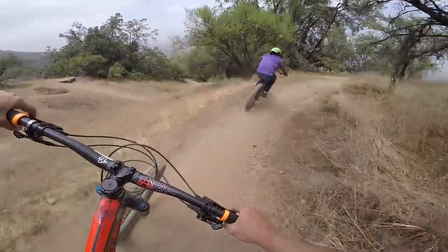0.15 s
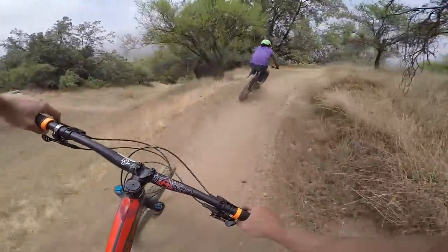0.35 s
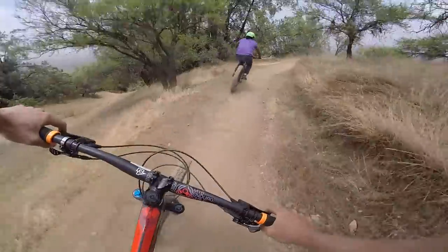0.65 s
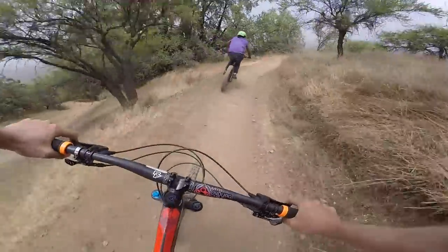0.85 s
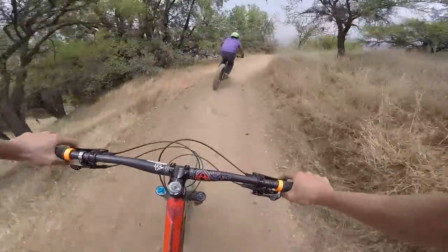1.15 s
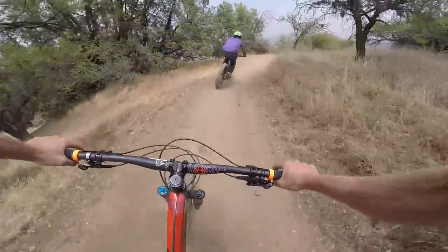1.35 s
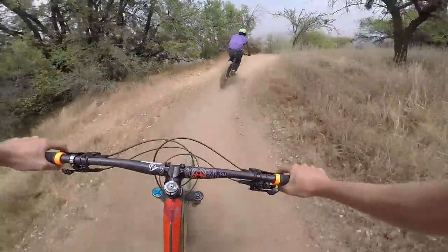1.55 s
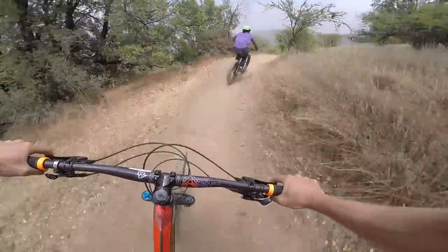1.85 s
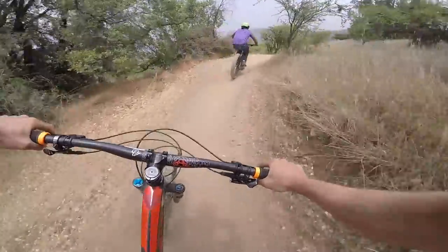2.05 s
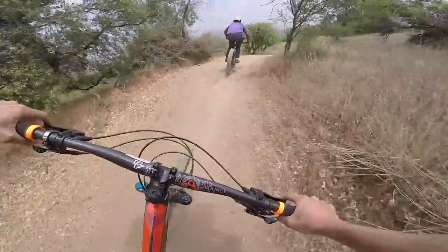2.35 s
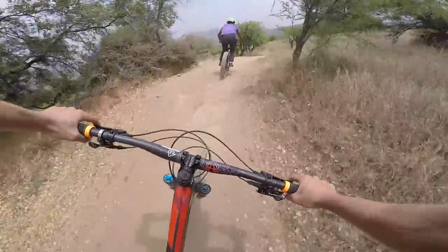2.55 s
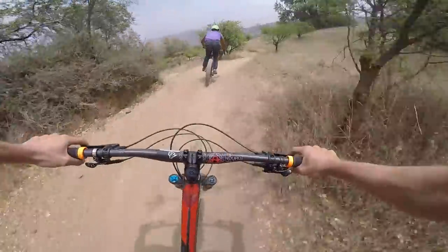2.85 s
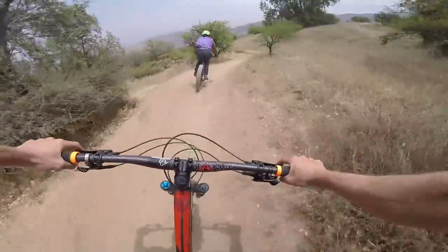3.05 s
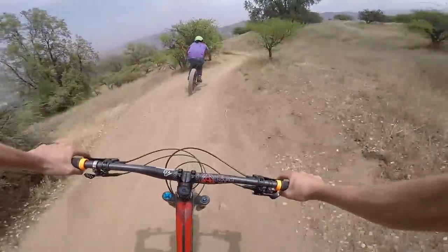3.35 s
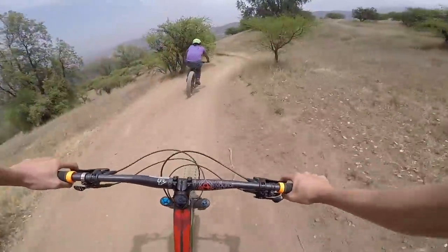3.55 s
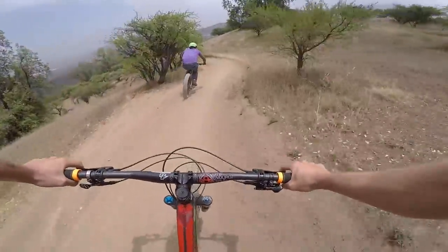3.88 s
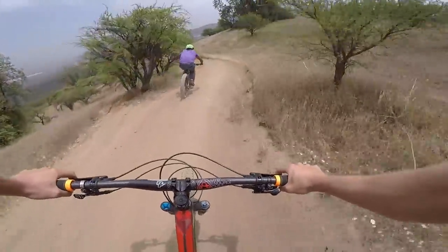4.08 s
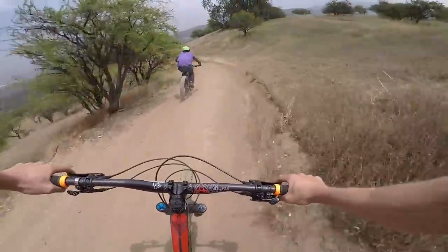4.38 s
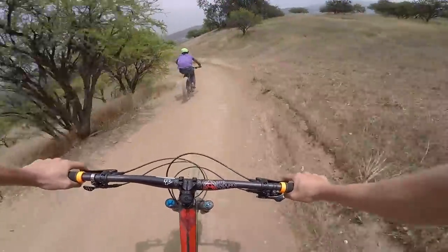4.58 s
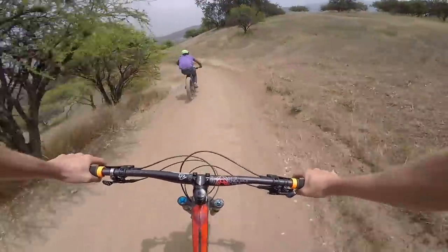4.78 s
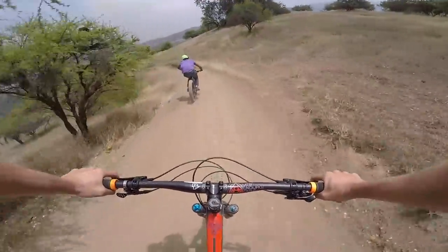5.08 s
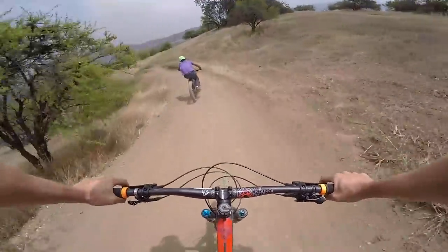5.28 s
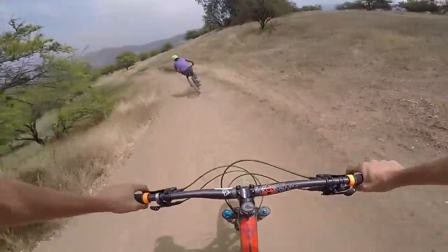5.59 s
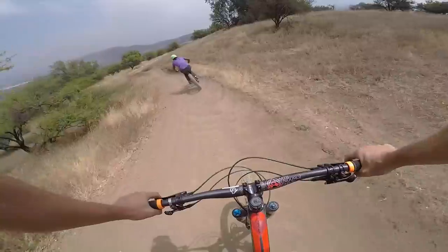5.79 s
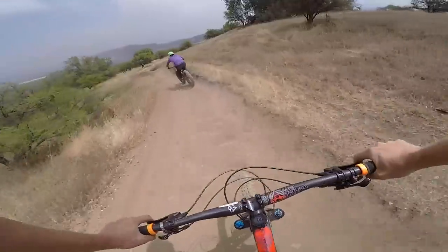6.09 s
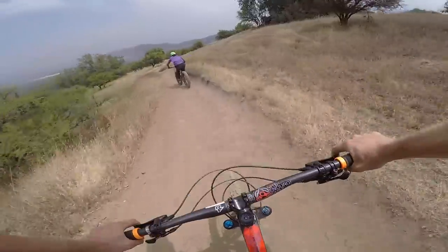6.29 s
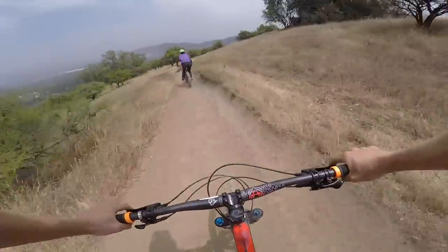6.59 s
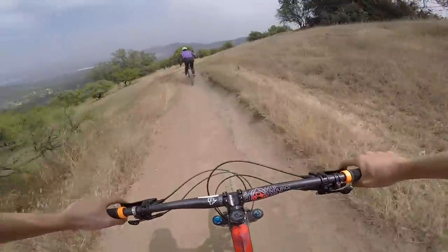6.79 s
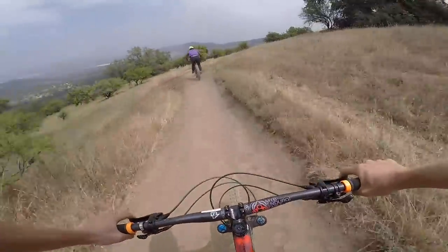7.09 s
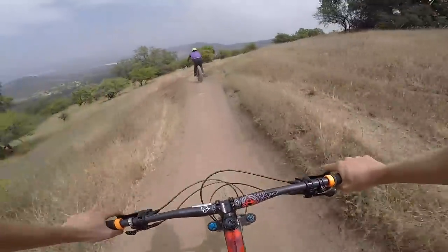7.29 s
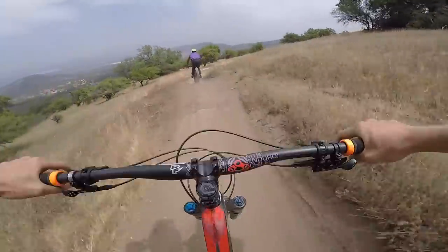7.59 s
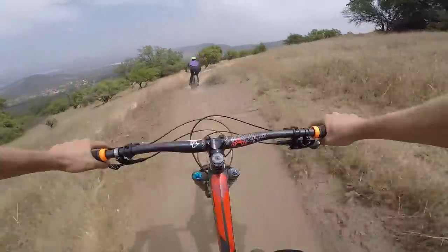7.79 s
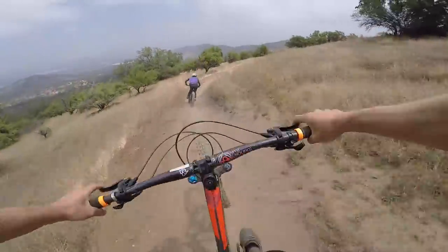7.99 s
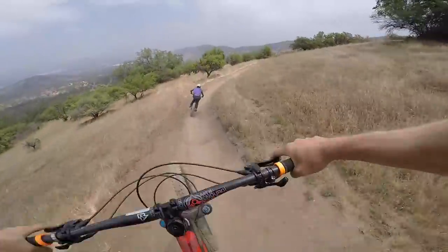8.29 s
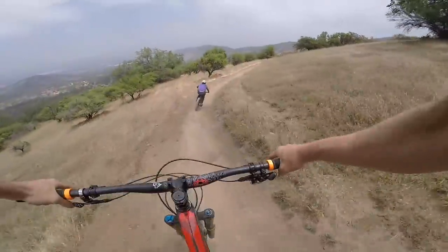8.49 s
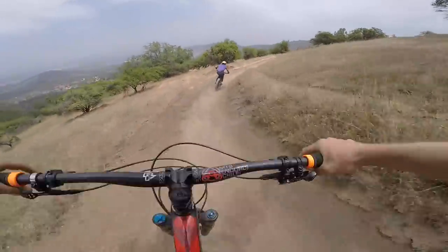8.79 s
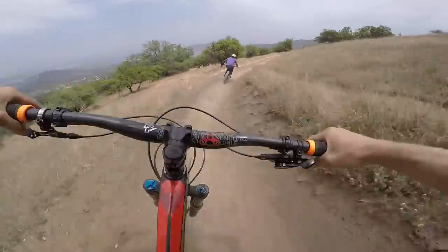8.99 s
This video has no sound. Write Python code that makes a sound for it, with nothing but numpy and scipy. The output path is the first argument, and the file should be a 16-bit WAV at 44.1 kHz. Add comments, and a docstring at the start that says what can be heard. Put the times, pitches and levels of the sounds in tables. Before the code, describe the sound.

A mountain bike coasts down a loose dirt trail, heard from a microphone worn by the rider in open air, with almost no echo. Deep, uneven wind buffeting and fluttering roar dominate throughout, over crackling tyre hiss, dull tread scrub and a fine metallic freewheel buzz. From 0 to 2 s, brief wavering high brake chirps squeak, most clearly from 1 to 1.9 s, with light stone ticks and knocks. A sharp metallic click lands at 2.4 s and a smaller knock at 3.5 s. Heavy gusts thump around 4.1 to 4.4 s and 5.3 s over smoother rolling. At 6.2 s a hard clatter starts dense gravel and rattling until a very loud crack at 7.6 s. Gusts and a tyre scuff follow near 7.9 s, rolling softens around 8.2 to 8.6 s, then a short sharp scuff and rattling stones resume from 8.8 s, ending with a strong grit hit at 9.1 s.

```python
"""Wind buffeting on a chest-worn microphone and brief brake chirps open a coast down a dirt trail.
Wind is noise modulated by eddies, with separate gusts; the brake is a wavering tone with its octave.
Stones and rattling parts are struck resonances, and scuffs are swelling bands of noise.
Ratchet clicks and the tremor of the trail excite the resonances of the rear hub and spokes.
The tyres hiss, crackle and scrub on loose dirt: coloured noise shaken by small bumps."""
import sys
import numpy as np
from scipy import signal
from scipy.fft import rfft, irfft
from scipy.io import wavfile
from scipy.ndimage import uniform_filter1d

SR = 44100
rng = np.random.default_rng(int(sys.argv[2]) if len(sys.argv) > 2 else 0)


def to_wav(sig):
    """Store sig (one row per channel, or 1-D mono) as 16-bit WAV at the path in sys.argv[1].

    Samples outside -1..1 are clipped; the rate is SR.
    """
    pcm = np.clip(np.atleast_2d(sig), -1, 1) * 32767
    pcm = np.round(pcm).astype(np.int16)
    wavfile.write(sys.argv[1], SR, pcm.T)  # frames by channels


N = 403074  # samples

# Wind between the gusts: [t/s, nominal buffeting level/dB, nominal roar level/dB]
WIND_LEVELS = [(0, -13.5, -24), (.4, -17.5, -29.5), (.7, -15.5, -27.5), (1.24, -11.5, -30.5),
               (1.29, -22.5, -26.5), (1.9, -16, -29.5), (2.35, -23, -27), (2.77, -13.5, -34.5),
               (3.0, -18, -31.5), (3.9, -19.5, -35), (4.5, -20, -36.5), (5.2, -14, -30), (5.55, -22, -33.5),
               (5.85, -23, -30.5), (6.3, -14, -24), (6.8, -20.5, -25.5), (7.6, -14, -25.5),
               (8.2, -22.5, -32), (8.45, -15, -34.5), (8.72, -14.5, -30.5), (8.92, -24.5, -23.5),
               (9.14, -16.5, -23)]
# Relative spectrum of the buffeting: [f/Hz, level per Hz/dB]
BUFFET_SPECTRUM = [(7.1, -51), (14, -3), (32, 4), (55, 3.5), (87, -2.5), (209, -19), (268, -18.5),
                   (415, -33), (500, -38.5), (650, -37.5), (1100, -120)]
# Relative spectrum of the roar: [f/Hz, level per Hz/dB]
ROAR_SPECTRUM = [(59, -1), (100, -2), (204, -22), (268, -4.5), (314, -13), (511, -13.5), (911, -26),
                 (1500, -31), (1950, -48), (3300, -120)]
# Direct gusts on the microphone port:
# [peak t/s, low push level/dB, rumble level/dB, rumble length/s, f that scales the rumble bands/Hz]
GUST_EVENTS = [(0.211, -16, -16.5, .025, 248), (0.257, -19, -11, 0.022, 392),
               (0.701, -21, -17.5, .055, 200), (0.995, -32, -16, 0.064, 246), (1.2, -37, -16.5, 0.056, 209),
               (1.443, -41, -26.5, 0.041, 620), (1.884, -12.5, -24, 0.043, 198),
               (2.164, -13.5, -23.5, 0.039, 247), (2.621, -21, -20, 0.04, 250),
               (4.059, -9.5, -19.5, 0.033, 334), (4.115, -19, -8, 0.028, 445),
               (4.17, -17, -13.5, 0.024, 277), (4.269, -18.5, -16, 0.043, 252),
               (4.352, -19, -13.5, 0.061, 252), (5.323, -7.5, -9, 0.031, 504), (5.36, -38, -15, 0.026, 383),
               (5.972, -11.5, -17.5, 0.04, 190), (6.17, -21.5, -37, 0.039, 250),
               (6.53, -13, -42, 0.036, 250), (6.937, -14.5, -41, 0.025, 250), (7.199, -31, -16, .04, 171),
               (7.288, -10, -13.5, 0.024, 322), (7.468, -22, -19.5, 0.01, 500),
               (7.754, -9.5, -10.5, 0.048, 202), (7.926, -14, -15.5, 0.036, 324),
               (8.05, -12.5, -16.5, 0.029, 254), (8.291, -18, -22, 0.026, 302),
               (8.468, -30, -14.5, .055, 198), (8.588, -32, -15.5, 0.06, 208),
               (8.725, -14, -16.5, 0.057, 250), (9.033, -13.5, -39, 0.038, 250)]
BUILD_S, DROP_S = 0.075, 0.035  # the low push builds slowly and lets go fast
LULL_DB, LULL_AFTER_S, LULL_S = -22, 0.11, 0.032  # depth at full-scale push, delay, width

# Tyre scuffs through loose dirt: [middle t/s, level/dB, length/s, centre f/Hz]
SCUFF_EVENTS = [(0.925, -40, 0.044, 10000), (1.417, -40, .03, 11000), (1.611, -36, 0.029, 9000),
                (2.154, -32.5, 0.046, 5300), (2.362, -34.5, 0.043, 7000), (3.128, -37, 0.037, 10000),
                (7.039, -34.5, 0.021, 8000), (7.273, -31.5, 0.026, 6500), (7.911, -24, 0.033, 6050),
                (7.916, -30, 0.046, 2500), (8.09, -37, 0.035, 6300), (8.788, -22, 0.01, 7850),
                (8.968, -38, 0.078, 5460), (9.029, -33, 0.027, 5000)]
SCUFF_WIDTH = 0.74  # width of each of two cascaded resonances, as a share of the centre

# Blows on stones and rattling parts: [t/s, peak level/dB, part]
KNOCK_EVENTS = [(0.251, -20.5, "frame"), (0.6, -23, "frame"), (1.24, -20, "frame"), (1.42, -21, "frame"),
                (1.56, -23, "frame"), (1.586, -15.5, "tyre"), (1.599, -16.5, "tyre"), (1.743, -16.5, "rim"),
                (2.429, -12, "grit"), (2.43, -13, "caliper"), (3.459, -17.5, "pedal"),
                (5.833, -18.5, "grit"), (6.168, -18.5, "guard"), (6.185, -19, "guard"),
                (6.19, -19.5, "frame"), (6.202, -12, "chain"), (6.203, -12, "caliper"),
                (6.244, -8.5, "grit"), (6.337, -27, "guard"), (6.374, -22, "guard"),
                (6.396, -14.5, "guard"), (6.447, -22, "grit"), (6.497, -21, "grit"), (6.532, -20, "guard"),
                (6.561, -19, "frame"), (6.624, -13.5, "grit"), (6.868, -18, "guard"), (6.99, -20, "guard"),
                (7.005, -17, "guard"), (7.091, -13, "guard"), (7.275, -17, "frame"), (7.54, -29, "rim"),
                (7.561, -11.5, "guard"), (7.5837, 1, "rim"), (8.697, -22, "rim"), (8.792, -15, "frame"),
                (8.814, -18, "chain"), (8.829, -12, "grit"), (8.865, -17, "grit"), (8.889, -18, "frame"),
                (8.9, -15.5, "guard"), (8.912, -12, "guard"), (9.101, -16, "chain"), (9.101, -4.5, "grit"),
                (9.123, -20, "frame")]
# Parts that rattle when struck: part: [centre f/Hz, nominal width/Hz, t60/s]
RATTLING_PARTS = {"frame": (1260, 2200, 0.048), "chain": (3210, 660, 0.018), "guard": (5250, 7300, 0.039),
                  "grit": (6400, 9700, 0.025)}
# Parts that ring clearly when struck: part: modes [f/Hz, relative level/dB, t60/s]
RINGING_PARTS = {"tyre": [(736, 1, 0.071), (1230, -8, .025), (1520, -4, .02)], "rim": [(1710, 6, 0.015),
                 (1400, -7.5, 0.019), (2500, -5, .008), (5000, -14, 0.0054)], "pedal": [(1320, -1, 0.015),
                 (603, -7, .02)], "caliper": [(2920, 2, .03), (3270, 2, .03), (5030, 0, 0.034),
                 (7440, -4, .025)]}
# Loose stones flung up by the wheels: [t/s, mean rate/(stones per s)]
GRAVEL_RATE = [(0, 25), (2.5, 25), (3, 3), (4, 0), (6.13, 0), (6.2, 130), (7.3, 100), (7.6, 30), (8.05, 8),
               (8.12, 0), (8.68, 0), (8.8, 80), (9.14, 80)]

# Brake chirps: [peak t/s, nominal level/dB, nominal f/Hz, length/s]
CHIRP_EVENTS = [(.008, -30, 7600, 0.0083), (0.136, -31, 7580, 0.018), (0.505, -43, 7540, 0.026),
                (0.747, -28, 7530, 0.026), (.865, -34, 7500, 0.021), (1.046, -26.5, 7320, 0.03),
                (1.101, -23.5, 7450, 0.039), (1.17, -39, 7540, .028), (1.215, -19, 7440, 0.016),
                (1.532, -17.5, 7480, 0.013), (1.591, -22, 7410, 0.023), (1.65, -38, 7300, .027),
                (1.717, -19.5, 7360, 0.015), (1.834, -14.5, 7440, 0.025), (1.897, -37, 7660, 0.024),
                (1.958, -36.5, 7700, 0.053)]
RISE_SHARE, OCTAVE_DB = 0.44, -19  # share of a chirp spent rising; octave before its extra fading

# Ratchet teeth passing the pawls: [t/s, nominal rate/(clicks per s)]
RATCHET_RATE = [(0, 227), (1.5, 144), (3, 110), (4, 163), (5, 170), (6, 178), (8.2, 180), (9.14, 160)]
# Resonances of hub shell and spokes: [f/Hz, nominal width/Hz, relative level/dB]
HUB_MODES = [(2200, 200, -10), (2405, 138, 7), (3720, 220, -10.5), (3910, 49, -7), (5000, 640, -9),
             (5356, 97, -9.5), (6460, 160, -13), (7800, 620, -15.5), (9480, 600, -20.5), (11800, 200, -22),
             (13300, 2200, -21.5)]
# Limits between the low, middle and high groups of hub resonances: [f/Hz]
GROUP_EDGES_HZ = [3000, 4500]
# Hub loudness: [t/s, low group level/dB, middle group level/dB, high group level/dB]
HUB_LEVELS = [(0.0, -43, -42.5, -44), (0.6, -36.5, -42.5, -44), (.73, -39, -38, -40), (0.91, -29, -43, -36),
              (1.02, -33.5, -39, -40), (1.4, -36, -39, -42), (2.31, -42, -43.5, -45), (2.65, -35, -41, -38),
              (3.64, -38, -41, -44.5), (3.97, -33, -37.5, -41), (4.22, -43.5, -45.5, -45.5),
              (4.55, -37, -47, -44), (4.9, -36.5, -41.5, -41), (5.27, -29.5, -42, -37),
              (5.37, -38, -49.5, -45), (6.01, -39.5, -44.5, -44.5), (6.29, -39, -65, -40),
              (6.54, -32.5, -42, -40), (6.72, -39, -54, -46), (6.75, -32, -44, -36),
              (6.85, -38.5, -44, -40), (7.36, -33, -45, -38), (7.69, -41, -46, -36.5),
              (7.86, -39, -55, -43), (7.92, -39, -42, -33), (7.97, -64, -67, -54),
              (8.07, -36.5, -40.5, -41), (8.2, -52, -68, -60), (8.47, -38.5, -50, -46),
              (8.94, -40.5, -43, -43), (8.99, -30, -40, -32), (9.06, -44, -47, -58), (9.11, -37, -50, -34),
              (9.14, -42, -50, -46)]
WAVER = .005  # rms pitch drift of each hub resonance, as a share of its frequency

# Rolling: [t/s, nominal hiss level/dB, gain of the hiss treble/dB, scrub level/dB]
ROLLING_LEVELS = [(0, -40.5, 4, -42), (.94, -38.5, 5, -37), (1.45, -38, 5, -41), (1.55, -33.5, -1.5, -38.5),
                  (2.44, -37, 5, -37.5), (2.9, -36.5, 4, -39), (4.02, -36.5, 0.5, -40.5),
                  (4.25, -41, 4, -43.5), (4.58, -42.5, 3, -45), (5.25, -37, 0, -38),
                  (5.35, -46.5, 3, -40.5), (5.6, -43, -1, -49), (6.12, -38, -3, -37),
                  (6.19, -34, -9, -36.5), (6.9, -36, 1.5, -35), (7.79, -36, 2, -34.5),
                  (7.97, -39, 1, -39.5), (8.15, -44.5, 0, -50), (8.47, -46.5, 5, -46),
                  (8.73, -39.5, -3, -36), (8.95, -41, 8, -36.5), (9.14, -42.5, 9, -34)]
# Relative spectrum of the tyre hiss: [f/Hz, level per Hz/dB]
HISS_SPECTRUM = [(1180, -19), (2000, -11), (2420, -5), (2770, -9), (3810, -10.5), (4250, -18), (5180, -9.5),
                 (7120, -18.5), (13700, -19.5), (15500, -21)]
# Relative spectrum of the dull tread scrub: [f/Hz, level per Hz/dB]
SCRUB_SPECTRUM = [(350, -16), (600, -9.5), (1270, -6), (2240, 1.5), (2430, -14), (2810, -6), (4500, -10.5),
                  (5850, -21.5), (9900, -120)]
TOP_HZ = 9000  # where the hiss treble begins

EDGE_HZ = 15480  # upper band limit of the whole sound


def amp(db):
    """Level and amplitude: a level in decibels becomes a linear gain."""
    return 10 ** (np.asarray(db) / 20)


def evened(x):
    """Normalisation: a signal is scaled to an rms of 1."""
    return x / np.sqrt(np.mean(x ** 2) + 1e-20)


def curve(rows, t):
    """Linear interpolation: each column of a table is joined by straight lines at the times t."""
    s, *columns = np.transpose(rows)
    return [np.interp(t, s, c) for c in columns]


def add(mix, s, sound):
    """Superposition: a sound is summed into the mix from s seconds on."""
    part = mix[max(round(s * SR), 0):][:len(sound)]
    part += sound[:len(part)]


def resonate(x, hz, width_hz):
    """Resonance: one damped pole passes its centre at a gain near 1."""
    r = np.exp(-np.pi * width_hz / SR)
    pole = r * np.exp(2j * np.pi * hz / SR)
    return 2 * signal.lfilter([1 - r], [1, -pole], x).real


def wandering(x, hz, width_hz):
    """Heterodyning: shifting the signal about zero lets a steep resonance follow the curve hz."""
    turn = np.exp(2j * np.pi * np.cumsum(hz) / SR)
    r = np.exp(-np.pi * width_hz / SR)
    ring = signal.lfilter([(1 - r) ** 2], [1, -2 * r, r ** 2], x / turn)
    return 2 * (turn * ring).real


def lumps(per_s):
    """Slow random fluctuation: smoothed noise of rms 1 changes about per_s times a second."""
    span = max(int(SR / per_s), 1)
    smooth = uniform_filter1d(rng.standard_normal(N), span)
    return evened(uniform_filter1d(smooth, span))


def colour(x, spectrum):
    """Spectral shaping: a signal is filtered by a curve over log frequency, then set to rms 1."""
    f, db = np.transpose(spectrum)
    hz = np.fft.rfftfreq(N, 1 / SR)
    gain = amp(np.interp(np.log(hz + 1), np.log(f + 1), db))
    return evened(irfft(rfft(x) * gain, N))


def steadied(x, s):
    """Gain control: division by the local rms evens out swells slower than about s seconds."""
    span = int(s * SR)
    power = uniform_filter1d(uniform_filter1d(x ** 2, span), span)
    return evened(x / np.sqrt(power + 0.078))


def patchy(x, db):
    """Time-frequency modulation: patches near 700 Hz by 0.08 s grow louder and softer."""
    z = signal.stft(x, nperseg=512)[2]
    patches = uniform_filter1d(rng.standard_normal(z.shape), size=8, axis=0)
    patches = uniform_filter1d(patches, size=14, axis=1)
    return evened(signal.istft(z * amp(db * evened(patches)), nperseg=512)[1][:N])


def pushes(t):
    """Gust pressure: a slow build and fast release give a push gain, then a lull in dB."""
    s, push_db = np.transpose(GUST_EVENTS)[:2]
    gain = amp(push_db)[:, None]
    coarse = t[::100]
    since = coarse - s[:, None]
    push = gain * np.exp(-(since / np.where(since < 0, BUILD_S, DROP_S)) ** 2)
    lull_db = LULL_DB * gain * np.exp(-((since - LULL_AFTER_S) / LULL_S) ** 2)  # deeper for strong pushes
    return np.interp(t, coarse, push.sum(0)), np.interp(t, coarse, lull_db.sum(0))


def wind(t):
    """Turbulent pressure: short eddies press on the microphone and make buffeting and roar flutter."""
    buffet_db, roar_db = curve(WIND_LEVELS, t)
    eddies, slaps = lumps(per_s=53.0), lumps(per_s=36.0)
    buffet_swell = amp(3.5 * eddies + 1.3 * lumps(per_s=55))
    buffet = colour(rng.standard_normal(N) * buffet_swell, BUFFET_SPECTRUM)
    roar_swell = amp(1.1 * eddies + 2.55 * lumps(per_s=120))
    roar = colour(rng.standard_normal(N) * roar_swell, ROAR_SPECTRUM)
    push, lull_db = pushes(t)
    strength = np.hypot(amp(buffet_db + lull_db), push) * amp(0.58 * slaps)
    return strength * steadied(buffet, 0.073) + amp(roar_db + 1.3 * slaps) * steadied(roar, 0.35)


def gust(db, length, hz):
    """Turbulent burst: rumble swells quickly, and its upper band is strongest at the peak."""
    t = np.arange(-2 * length, 2 * length, 1 / SR)
    noise = rng.standard_normal((2, 14000))
    noise = signal.sosfiltfilt(signal.butter(2, 5.2 * hz, fs=SR, output="sos"), noise)
    low = resonate(resonate(noise[0], 0.31 * hz, 0.86 * hz), 0.31 * hz, 0.86 * hz)
    top = resonate(resonate(noise[1], 1.1 * hz, 0.92 * hz), 1.1 * hz, 0.92 * hz)
    low, top = evened(low)[:len(t)], evened(top)[:len(t)]
    swell = np.exp(-1.5 * (t / length) ** 2)
    return amp(db) * swell * (low + amp(-15.5) * swell ** 11.0 * top)


def scuff(db, length, hz, width_hz):
    """Friction noise: a wide band of hiss swells and fades as the tyre slides on dirt."""
    noise = resonate(resonate(rng.standard_normal(9000), hz, width_hz), hz, width_hz)
    size = int(2 * length * SR)
    return amp(db) * evened(noise)[:size] * np.hanning(size)


def knock(db, hz, width_hz, t60):
    """Forced vibration: a sharp blow and dying rattle excite the broad resonance of the struck part."""
    t = np.arange(3000) / SR
    rattle = rng.standard_normal(len(t)) * amp(-60 * t / t60) * np.minimum(t / (0.041 * t60), 1)
    blow = rattle + 3.6 * (t == 0)
    sound = resonate(resonate(blow, hz, 1.07 * width_hz), hz, 1.07 * width_hz)
    sound = signal.lfilter(*signal.butter(2, min(hz + 0.38 * width_hz, 15000), fs=SR), sound)
    return amp(db) * sound / abs(sound).max()


def ping(db, modes):
    """Modal vibration: one blow sets damped modes ringing, roughened by a short scrape."""
    t = np.arange(3000) / SR
    sound = np.zeros(len(t))
    for hz, mode_db, t60 in modes:
        phase = 2 * np.pi * (hz * t + 0.068 * rng.standard_normal())
        sound += amp(mode_db - 60 * t / t60) * np.sin(phase)
    scrape = uniform_filter1d(rng.standard_normal(len(t)), size=5) * amp(-7 - 60 * t / 0.01)
    sound = (sound + scrape) * np.minimum(t / .0004, 1)
    return amp(db) * sound / abs(sound).max()


def gravel(t):
    """Random impacts: small stones, a few of them large, strike frame and tyre at a varying rate."""
    out = np.zeros(N)
    slot_s = 400 / SR  # at most one stone in each slot
    draws = rng.random((int(N / 400), 3))
    slot = np.arange(len(draws)) * slot_s
    for s, per_s, (chance, size, pitch) in zip(slot, curve(GRAVEL_RATE, slot)[0], draws):
        hz = 2400 * 3.8 ** pitch
        if chance < per_s * slot_s:
            add(out, s, knock(-27 - 2.8 * np.log(size + .06), hz, hz, .014))  # low draws are loud
    return out


def chirp(db, hz, rise, fall):
    """Frictional oscillation: pad on disc sings unsteadily with its octave, sagging as it lets go."""
    t = np.arange(-2 * rise, 2 * fall, 1 / SR)
    place = np.where(t < 0, t / rise, t / fall)
    waver = uniform_filter1d(rng.standard_normal((2, 5000)), 90)[:, :len(t)]
    sag = 0.0027 * place + 0.027 * np.maximum(place, 0) ** 2
    pitch = hz * (1 - sag + 0.066 * waver[0])
    turn = 2 * np.pi * np.cumsum(pitch) / SR
    grip = amp(-15 * abs(place) ** 2.0) + 0.049 * amp(-9 * place ** 2)
    tone = amp(db + 12.0 * waver[1]) * np.sin(turn)
    octave = amp(db + OCTAVE_DB) * grip * np.sin(2 * turn)  # fades faster than the tone
    return np.sqrt(2) * grip * (tone + octave)


def hub(t):
    """Resonant excitation: uneven pawl clicks and the tremor of the trail ring hub and spokes."""
    rate = curve(RATCHET_RATE, t)[0] * (1 + .06 * lumps(per_s=60))
    teeth = np.diff(np.floor(np.cumsum(rate) / SR), prepend=0)
    clicks = teeth * amp(0.49 * rng.standard_normal(N))
    snaps = signal.oaconvolve(clicks, np.exp(-np.arange(300) / (0.001 * SR)))[:N]
    # the constant lets noise through between clicks
    drive = rng.standard_normal(N) * (1.4 + evened(snaps)) * amp(1.66 * lumps(per_s=38))
    groups = np.zeros((3, N))
    for hz, width_hz, db in HUB_MODES:
        drift, swell = lumps(per_s=11), lumps(per_s=7.3)
        ring = wandering(drive, hz * (1 + WAVER * drift), 1.18 * width_hz)
        add(groups[np.searchsorted(GROUP_EDGES_HZ, hz)], 0, amp(db + 0.74 * swell) * ring)
    return sum(amp(db) * evened(group) for db, group in zip(curve(HUB_LEVELS, t), groups))


def tyres(t):
    """Rolling noise: dust hisses with crackling grit and the tread scrubs; small bumps shake both."""
    hiss_db, top_db, scrub_db = curve(ROLLING_LEVELS, t)
    bumps = lumps(per_s=43)
    grain_gain = amp(8.0 * np.minimum(rng.exponential(1, N), 5))
    grit = grain_gain * (rng.random(N) < 300 / SR)  # about 300 grains a second
    grit = signal.oaconvolve(grit, np.exp(-np.arange(400) / (0.006 * SR)))[:N]  # each a short puff
    dust = rng.standard_normal((2, N)) * (1 + 0.22 * evened(grit))
    hiss = patchy(colour(dust[0] * amp(0.96 * bumps), HISS_SPECTRUM), db=1.65)
    low = signal.sosfiltfilt(signal.butter(2, TOP_HZ, fs=SR, output="sos"), hiss)
    hiss = low + amp(top_db) * (hiss - low)
    scrub = colour(dust[1] * amp(2.0 * bumps + 0.96 * lumps(per_s=140)), SCRUB_SPECTRUM)
    return amp(hiss_db) * hiss + amp(scrub_db) * scrub


def scene():
    """Superposition and reflection: all sources meet at one microphone; ground returns the chirps."""
    t, brake, near = np.arange(N) / SR, np.zeros(N), np.zeros(N)
    for s, _, db, length, hz in GUST_EVENTS:
        add(near, s - 2 * length, gust(db, length, hz))
    for s, db, length, hz in SCUFF_EVENTS:
        add(near, s - length, scuff(db, length, hz, SCUFF_WIDTH * hz))
    for s, db, part in KNOCK_EVENTS:
        if part in RINGING_PARTS:
            add(near, s, ping(db, RINGING_PARTS[part]))
        else:
            add(near, s, knock(db, *RATTLING_PARTS[part]))
    for s, db, hz, length in CHIRP_EVENTS:
        rise = RISE_SHARE * length
        add(brake, s - 2 * rise, chirp(db, hz, rise, length - rise))
    ground = rng.standard_normal(3000) * amp(-60 * np.arange(3000) / SR / 0.092)  # t60 0.092 s
    ground /= np.linalg.norm(ground)
    brake = brake + amp(-13) * signal.oaconvolve(brake, ground)[:N]
    return (wind(t) + near + gravel(t) + brake + hub(t) + tyres(t))[None]


def record(dry):
    """Saturation and band limiting: strong lows are softly squeezed, peaks clipped, treble cut."""
    low = signal.sosfiltfilt(signal.butter(2, 900, fs=SR, output="sos"), dry)
    over = np.maximum(abs(low) - .6, 0)
    squeezed = np.sign(low) * (np.minimum(abs(low), .6) + .3 * np.tanh(over / .3))
    held = np.clip(dry - low + squeezed, -.96, .96)
    band_limit = signal.firwin(1023, EDGE_HZ, window=("kaiser", 9), fs=SR)
    return signal.oaconvolve(held, band_limit[None], "same")


dry = scene()
out = record(dry)
to_wav(out)
```